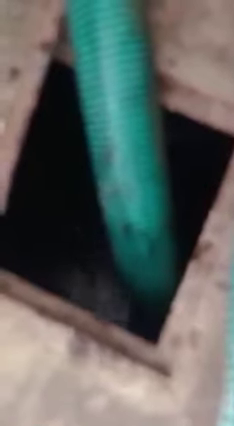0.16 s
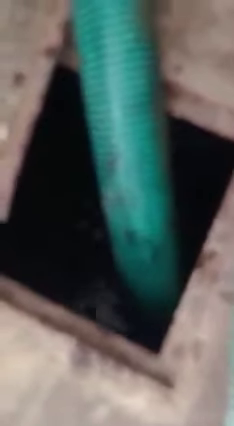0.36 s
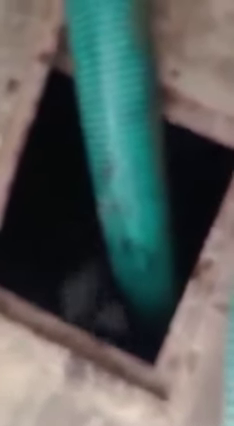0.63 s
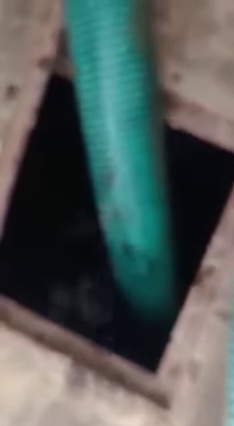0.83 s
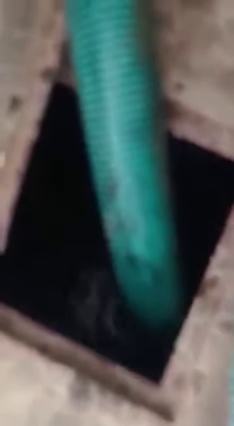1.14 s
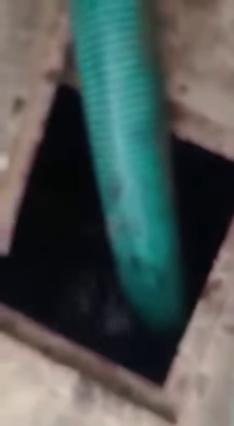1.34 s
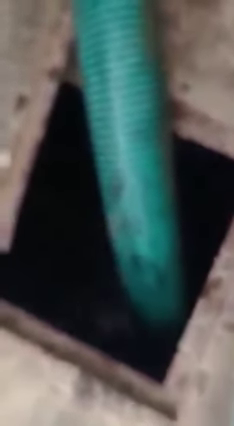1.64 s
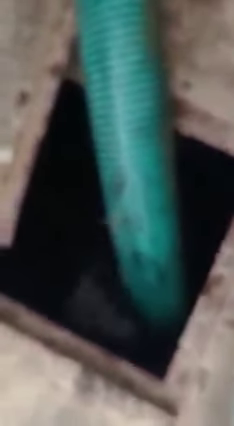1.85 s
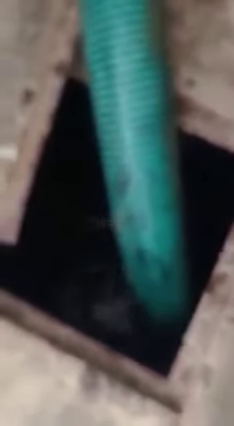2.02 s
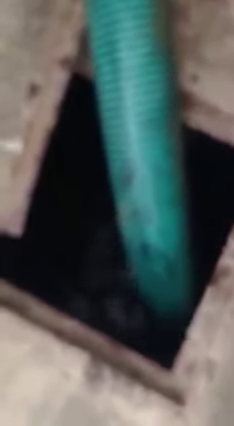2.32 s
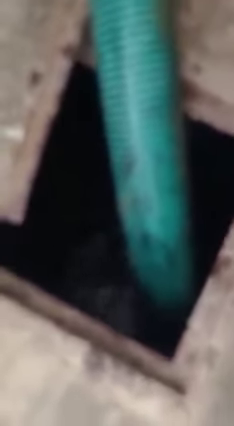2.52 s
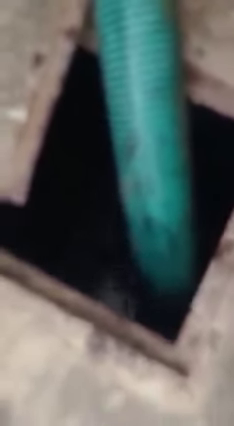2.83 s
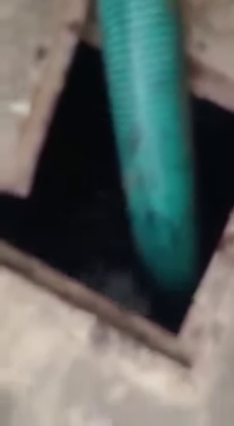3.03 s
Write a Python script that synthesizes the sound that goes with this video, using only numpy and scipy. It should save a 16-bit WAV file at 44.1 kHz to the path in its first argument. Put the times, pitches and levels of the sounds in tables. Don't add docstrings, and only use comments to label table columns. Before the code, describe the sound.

A vacuum pump's loud low hum, buzzy and near 78 hertz with strong overtones, runs throughout, throbbing about six times a second and shifting tone as the handheld microphone moves. Airy roar, bright hiss and faint whine surround it. Small wet spits come at 0.2-0.4 s, the strongest bubbling gulp at 0.7 s, a light one at 1.4 s, and a gush at 2.3 s. Close, dense, slightly saturated, with faint pit reflections.

```python
import sys
import numpy as np
from scipy import signal
from scipy.fft import rfft, irfft, next_fast_len
from scipy.io import wavfile
from scipy.ndimage import uniform_filter1d, map_coordinates

SR = 44100
rng = np.random.default_rng(int(sys.argv[2]) if len(sys.argv) > 2 else 0)


def put_to_file(sound):
    columns = np.atleast_2d(sound).T
    safe = np.clip(columns, -1, 1)
    whole_steps = np.round(safe * 32767)
    wavfile.write(sys.argv[1], SR, whole_steps.astype(np.int16))


def undo_db(level):
    steps = np.asarray(level, float) / 20
    return 10 ** steps


N = 139797

# t/s, vane rate f/Hz
VANE_RATE = [(0, 78.3), (.3, 78.85), (.5, 78.5), (.9, 78.26), (1.3, 78.17), (1.6, 77.82), (2.1, 77.95),
             (2.55, 78.45), (2.85, 78.3), (3.17, 78.05)]
# t/s, place in the pit echo (-1..1), beat depth level/dB
STANCE = [(0, -.2, 1), (.12, -.5, 1), (.24, -1, 0), (.42, -.95, -2), (.55, .15, -8), (.85, .22, -5),
          (1.1, .35, -2), (1.35, .8, 0), (1.6, 1, 0), (1.85, .9, 0), (2.1, .9, 0), (2.35, .5, 0),
          (2.6, .2, 1), (2.85, .6, 0), (3.17, .7, 1)]
# order, level/dB, line one beat below level/dB, line one beat above level/dB
ORDERS = [(1, -23.5, -72, -53), (2, -12, -57, -39.5), (3, -14.5, -21.5, -30), (4, -20.5, -26.5, -25),
          (5, -32, -30.5, -49), (6, -31.5, -39, -42), (7, -22.5, -37.5, -46), (8, -29, -31, -28.5),
          (9, -29.5, -30, -48), (10, -41.5, -66, -39), (11, -40, -37.5, -48), (12, -37, -30, -31),
          (13, -33.5, -31.5, -34), (14, -32, -53, -36.5), (15, -54, -39.5, -43.5), (16, -41, -67, -44),
          (17, -48, -51, -65), (18, -63, -39, -47), (19, -45, -45, -48.5), (20, -47.5, -46.5, -45)]
ECHO_TURN = [(.5, -1), (.45, .45), (.95, -.2), (1.4, -1.55), (1.1, -1.3), (1.2, -.3), (.75, 2.55),
             (1.3, -1.9), (1.2, -1.8)]
# t/s, lag/rad
BEAT_LAG = [(0, .7), (.6, .55), (.85, -.1), (1.1, -.5), (1.35, -.4), (1.85, 0), (2.6, 0), (2.85, .2),
            (3.17, -.1)]
RATTLE_ORDERS = [2.5, 3.5, 4.5, 5.5, 6.5, 8.5, 14.58, 14.82, 18.18, 18.84, 20.47, 32.44, 40.06, 43.6]
RATTLE_LEVELS = [-39, -34, -67, -45.5, -43, -33.5, -34, -37, -41, -36, -40.5, -51.5, -40.5, -43]
# f/Hz, level per Hz/dB
RUMBLE = [(10, -6), (24, -10), (50, -5), (75, -10)]
# f/Hz, level per Hz/dB
ROAR = [(12, -24), (50, -15), (110, -3.5), (280, 0), (420, -2.5), (700, 0.5), (1000, 0.5), (1300, -11),
        (1900, -8), (2600, -44)]
# f/Hz, width/Hz, level/dB
CASING_MODES = [(1490, 470, 8.5), (1010, 750, 0)]
# f/Hz, level per Hz/dB
HISS = [(1200, -25), (2100, -8), (3150, 0), (4000, -4), (5500, -9), (7800, 1.5), (8900, -3), (10000, -15),
        (12000, -21.5), (17000, -37)]
# f/Hz, width/Hz, level/dB
HOSE_MODES = [(2460, 150, 3), (2654, 130, -5), (2940, 140, 4), (3410, 85, 2.5), (5080, 250, 2.5),
              (9370, 300, -6)]
# t/s, level/dB, length/s
PUFFS = [(0, -20.5, 0.075), (.14, -24, 0.041), (0.378, -24.5, 0.18), (0.81, -24.5, 0.089), (0.9, -27, .05),
         (1.387, -23, 0.079), (1.697, -23, .04), (1.77, -22, .06), (2.313, -21, .06), (2.426, -21, 0.065),
         (2.6, -24.5, 0.12)]
# delay t/s, level/dB
WALLS = [(.0019, -21), (.0039, -19), (.0088, -19), (.017, -19)]
# t/s, level/dB, length/s, centre f/Hz
SLURPS = [
    (0.158, -23, 0.057, 1860),
    (0.229, -30, 0.039, 1500),
    (0.376, -21, .03, 4600),
    (0.682, -13.5, 0.091, 581),
    (0.679, -18.5, 0.096, 3130),
    (.785, -21, .06, 490),
    (.69, -22.5, .14, 1550),
    (1.388, -25, 0.057, 2100),
    (2.294, -31, 0.047, 900),
    (2.315, -23.5, .12, 1970),
]

CYCLE_HZ, BEAT_TOP_S = 5.9, .0994
UPPER_LAG, LAG_FALL = 2.7, 2.8
PULSE_TILT, SMEAR = -.5, .04
WANDER, WANDER_RATE, CORE_WANDER = .024, 8, .4
FIRING_DB, FIRING_HZ, RUMBLE_DB = -40, 35.5, -50
ROAR_DB, HISS_DB = -24, -22
RISE_S, JET_PATCHY_DB = .008, 1.2
WHINE_FIRST, WHINE_COUNT, WHINE_DB = 116, 9, -47
BUBBLE_CYCLES, BUBBLE_SPREAD, BUBBLE_RISE, BUBBLE_DB = 8, .22, .25, -6
TOP_HZ = 15755


def unit(x):
    return x / np.sqrt(np.mean(x ** 2) + 1e-20)


def curves(rows):
    s, *cols = np.transpose(rows)
    return [np.interp(np.arange(N) / SR, s, c) for c in cols]


def wobble(rate):
    knots = rng.standard_normal(int(N * 40 / SR) + 4)
    return map_coordinates(knots, [np.arange(N) * rate / SR], order=3)


def unsteady(rate):
    return wobble(rate) + 1j * wobble(rate)


def filtered(x, response):
    m = next_fast_len(N + 8192)
    return irfft(rfft(x, m) * response(np.fft.rfftfreq(m, 1 / SR)), m)[..., :N]


def colour(points):
    f, v = np.transpose(points)
    return lambda hz: undo_db(np.interp(np.log(hz + 1), np.log(f + 1), v, -120, -120))


def resonant(points, modes):
    def response(hz):
        bells = sum(db / (1 + (2 * (hz - c) / w) ** 2) for c, w, db in modes)
        return colour(points)(hz) * undo_db(bells)
    return response


def rush(response, patchy_db):
    z = signal.stft(rng.standard_normal(N), nperseg=512)[2]
    field = uniform_filter1d(rng.standard_normal(z.shape), size=8, axis=0)
    field = uniform_filter1d(field, size=8, axis=1)
    noise = signal.istft(z * undo_db(patchy_db * unit(field)), nperseg=512)[1][:N]
    return unit(filtered(noise, response))


def swell(start, length):
    t = np.clip(np.arange(N) / SR - start, 0, None)
    return (1 - np.exp(-t / RISE_S)) * np.exp(-t / length)


def shafts():
    vane = 2 * np.pi * np.cumsum(curves(VANE_RATE)[0]) / SR
    cycle = 2 * np.pi * CYCLE_HZ * (np.arange(N) / SR - BEAT_TOP_S) - curves(BEAT_LAG)[0]
    return vane, cycle


def pump():
    vane, cycle = shafts()
    place, depth_db = curves(STANCE)
    out = np.zeros(N)
    for i, (_, level_db, low_db, high_db) in enumerate(ORDERS):
        k = i + 1
        echo, high_fade, extra_lag, smear = 1, 1, 1, 10 * SMEAR
        if i < len(ECHO_TURN):
            turn, rest = ECHO_TURN[i]
            echo = np.cos(turn * place + rest)
            high_fade, extra_lag, smear = (1 + place) / 2, 0, SMEAR
        lag = UPPER_LAG * min(1, 3 / k) ** LAG_FALL + extra_lag
        wander = WANDER * k
        core = undo_db(level_db) * echo * (1 + CORE_WANDER * wander * unsteady(WANDER_RATE))
        low = undo_db(low_db) * (1 + wander * unsteady(WANDER_RATE)) * np.exp(-1j * cycle)
        high = undo_db(high_db) * high_fade * (1 + wander * unsteady(WANDER_RATE)) * np.exp(1j * (cycle - lag))
        lines = (core + undo_db(depth_db) * (low + high)) / np.sqrt(1 + wander ** 2)
        phase = k * vane + PULSE_TILT + smear * k * rng.normal()
        out -= np.sqrt(2) * np.real(lines * np.exp(1j * phase))
    for k, level_db in zip(RATTLE_ORDERS, RATTLE_LEVELS):
        out += undo_db(level_db) * np.real(unsteady(12) * np.exp(1j * k * vane))
    return out


def engine():
    thump = np.sqrt(2) * undo_db(FIRING_DB) * np.sin(2 * np.pi * FIRING_HZ * np.arange(N) / SR)
    shake = unit(filtered(rng.standard_normal(N), colour(RUMBLE)))
    return thump + undo_db(RUMBLE_DB) * shake


def air():
    vane, cycle = shafts()
    roar = rush(resonant(ROAR, CASING_MODES), patchy_db=-2.0)
    roar *= (1 + 0.15 * np.cos(vane)) * undo_db(0.4 * np.cos(cycle))
    hiss = rush(resonant(HISS, HOSE_MODES), patchy_db=0.68)
    hiss *= (1 + 0.072 * np.cos(vane)) * undo_db(0.28 * wobble(19) + 0.27 * wobble(4.18))
    puffs = sum(undo_db(db) * swell(s, length) for s, db, length in PUFFS)
    jet_colour = colour([(3000, -1), (6500, -8), (7900, 4), (9000, -7.5), (10500, -14), (17000, -35)])
    jet = rush(jet_colour, JET_PATCHY_DB)
    walls = lambda hz: 1 + sum(undo_db(db) * np.exp(-2j * np.pi * hz * s) for s, db in WALLS)
    return filtered(undo_db(ROAR_DB) * roar + undo_db(HISS_DB) * hiss + puffs * jet, walls)


def whine():
    vane = shafts()[0]
    orders = range(WHINE_FIRST, WHINE_FIRST + WHINE_COUNT)
    return undo_db(WHINE_DB) * sum(np.real(unsteady(25) * np.exp(1j * k * vane)) for k in orders)


def slurps(count=80):
    out, t = np.zeros(N), np.arange(SR // 20) / SR
    for s, db, length, hz in SLURPS:
        mouth = lambda f: (1j * f * .6 * hz / (hz * hz - f * f + 1j * f * 0.41 * hz)) ** 2
        gush = unit(filtered(rng.standard_normal(N), mouth))
        when = rng.random(count)
        pitch = hz * np.exp(BUBBLE_SPREAD * rng.standard_normal(count))[:, None]
        size = rng.exponential(size=count)[:, None]
        life = t * pitch / BUBBLE_CYCLES
        ring = np.sin(2 * np.pi * pitch * t * (1 + BUBBLE_RISE * life / 2))
        pops = undo_db(2 * size) * life * np.exp(1 - 2 * life) * ring
        at = ((s + 2 * length * when) * SR).astype(int)[:, None] + np.arange(len(t))
        bubbles = np.bincount(at.ravel(), pops.ravel(), N + SR)[:N]
        bubbles /= np.sqrt(np.sum(bubbles ** 2) / (2 * length * SR))
        out += undo_db(db - 0.5) * swell(s, length) * (gush + undo_db(BUBBLE_DB) * bubbles)
    return out


def scene():
    return (pump() + engine() + air() + whine() + slurps())[None]


def low_pass(x):
    return signal.sosfilt(signal.butter(12, 15960, fs=SR, output="sos"), x)


def record(dry):
    x = dry / (1 + np.abs(dry / 1.06) ** 6) ** (1 / 6)
    mix = filtered(x, lambda hz: hz < TOP_HZ)
    return low_pass(mix)


dry = scene()
out = record(dry)
put_to_file(out)
```